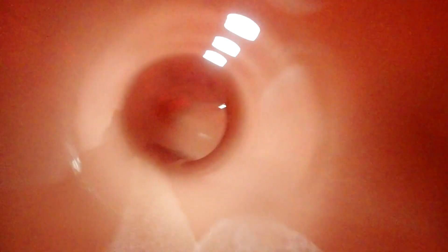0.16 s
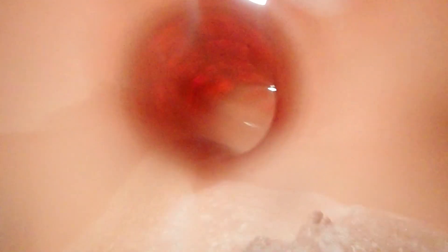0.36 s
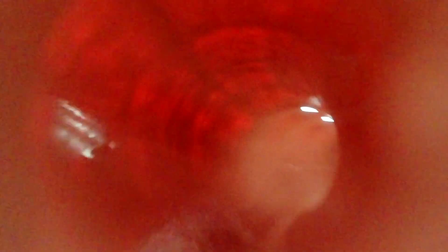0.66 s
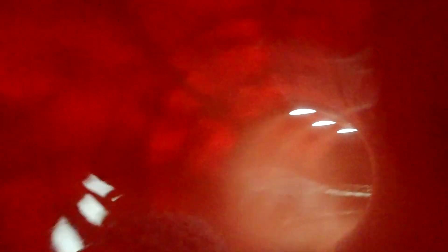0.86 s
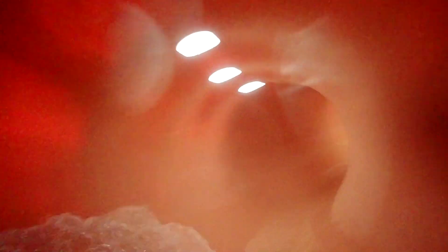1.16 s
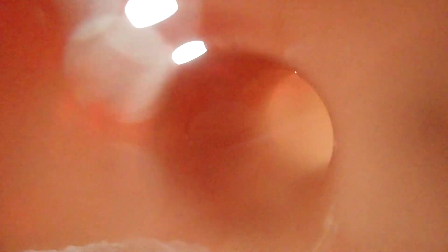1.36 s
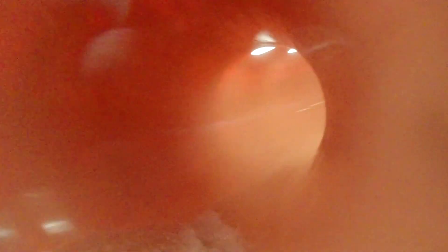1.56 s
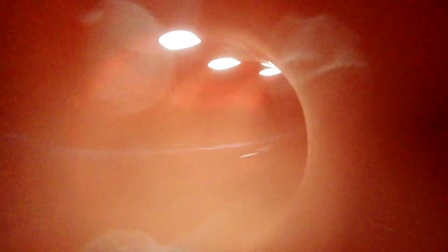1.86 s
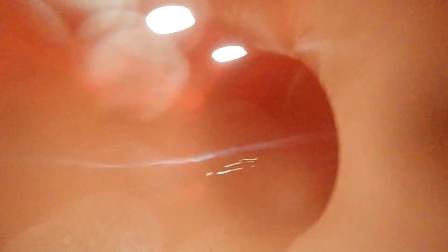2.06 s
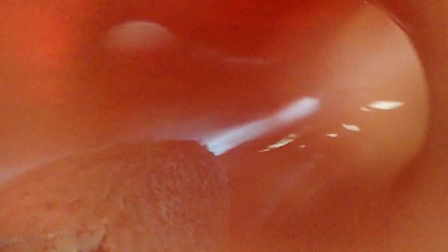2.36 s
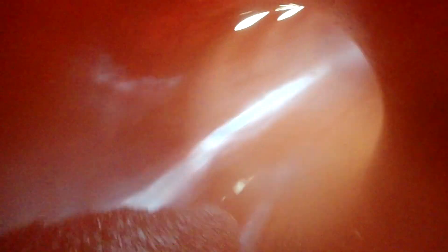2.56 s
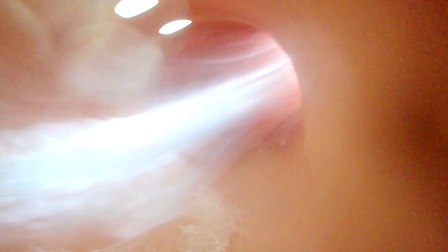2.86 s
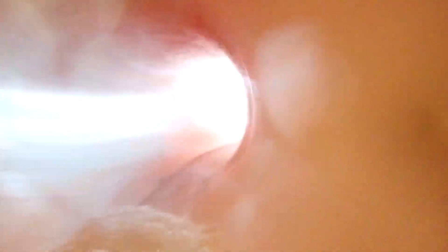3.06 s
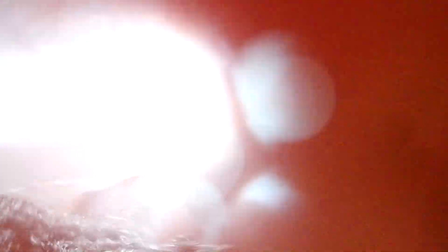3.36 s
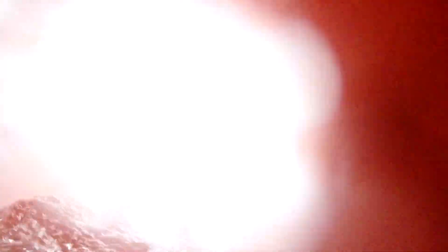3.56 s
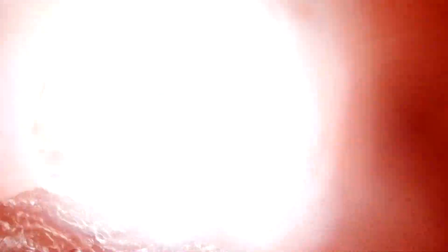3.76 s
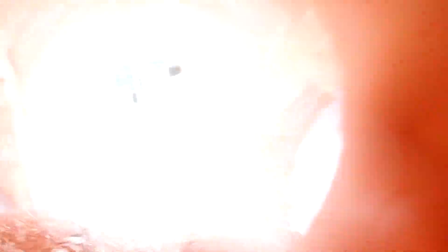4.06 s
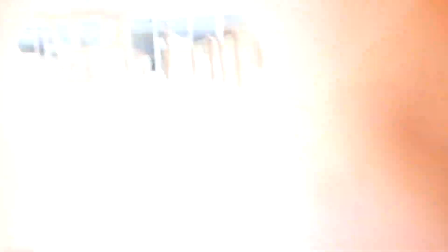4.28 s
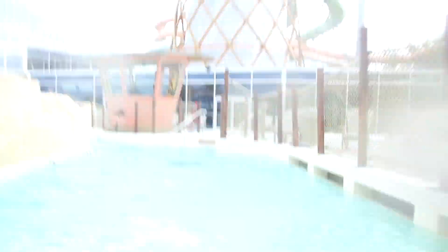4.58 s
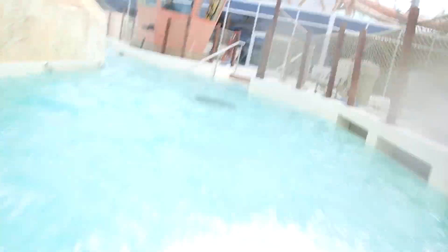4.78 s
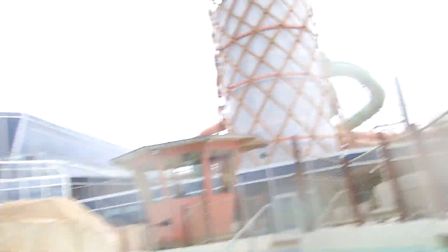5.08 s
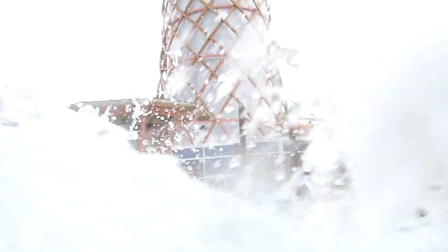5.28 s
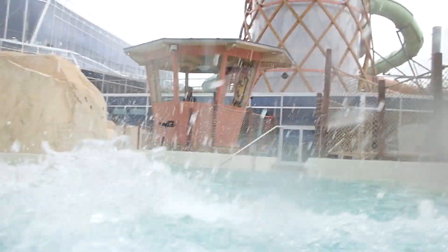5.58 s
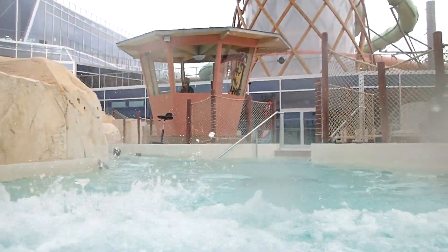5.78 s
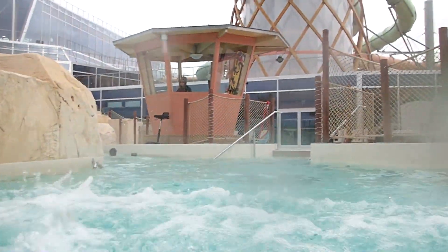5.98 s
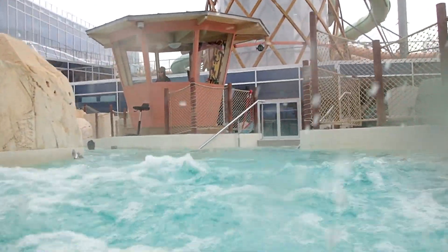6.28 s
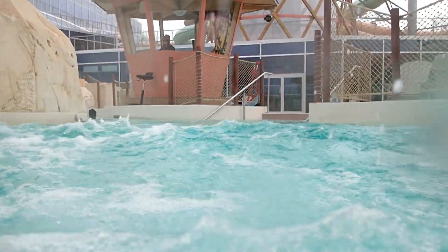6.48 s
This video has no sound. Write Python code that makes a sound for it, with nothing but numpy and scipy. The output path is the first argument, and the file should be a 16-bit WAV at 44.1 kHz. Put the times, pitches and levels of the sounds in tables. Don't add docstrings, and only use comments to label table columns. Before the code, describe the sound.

Water roars and wind buffets through an enclosed tube slide, then a hard splashing plunge, gulps, and muffled bubbling in a pool.

```python
import sys
import numpy as np
from scipy import signal
from scipy.fft import rfft, irfft, next_fast_len
from scipy.io import wavfile
from scipy.ndimage import uniform_filter1d, minimum_filter1d, map_coordinates

SR = 44100
rng = np.random.default_rng(int(sys.argv[2]) if len(sys.argv) > 2 else 0)


def wav_out(sig):
    wavfile.write(sys.argv[1], SR, np.round(np.clip(np.atleast_2d(sig).T, -1, 1) * 32767).astype(np.int16))


def gain_from_decibels(decibels):
    exponent = np.asarray(decibels, float) / 20
    return 10 ** exponent


N = 292383
TIME = np.arange(N) / SR
BLOW_TIME = np.arange(SR // 8) / SR


def unit(x):
    return x / np.sqrt(np.mean(np.abs(x) ** 2) + 1e-20)


def along(points, hz):
    f, v = np.transpose(points)
    return np.interp(np.log(hz + 1), np.log(f + 1), v)


def curves(rows, fade=0.017):
    s, *cols = np.transpose(rows)
    inside = np.minimum(TIME - s[0], s[-1] - TIME)
    gate = np.clip(inside / fade + 1, 0, 1)
    return [np.interp(TIME, s, c) for c in cols] + [gate]


def bumps(rows):
    return sum(db * np.exp(-((TIME - s) / half) ** 2) for s, db, half in rows)


def wobble(rate):
    at = [np.arange(N) * rate / SR]
    return np.array([map_coordinates(rng.standard_normal(N // 40), at) for port in "LR"])


def panned(db, pan_db):
    share = 1 / (1 + gain_from_decibels(-2 * np.asarray(pan_db)))
    return 2 * gain_from_decibels(db) * np.sqrt([share, 1 - share])


def rush(spectrum, alike, patchy_db, lumps_db=0):
    z = signal.stft(rng.standard_normal((2, N + 512)), nperseg=512)[2]
    field = uniform_filter1d(rng.standard_normal(z.shape[1:]), 6, 0)
    field = uniform_filter1d(field, 8, 1)
    pair = signal.istft(z * gain_from_decibels(patchy_db * unit(field)), nperseg=512)[1][:, :N]
    m = next_fast_len(N + 8192)
    hz = np.fft.rfftfreq(m, 1 / SR)
    alike = np.clip(along(alike, hz), 0, 1)
    a, b = rfft(pair * gain_from_decibels(lumps_db), m) * gain_from_decibels(along(spectrum, hz))
    right = alike * a + np.sqrt(1 - alike ** 2) * b
    return unit(irfft([a, right], m)[:, :N])


def add(out, s, sound):
    i = round(s * SR)
    out[:, i:i + sound.shape[1]] += sound


def ringing(events):
    out, t = np.zeros((2, N + SR)), BLOW_TIME
    for s, db, hz, pan_db, t60 in events:
        phase = 2 * np.pi * hz * t * (1 + 0.39 * t) + np.array([[0], [np.pi / 2]])
        onset = 1 - np.exp(-(t / 0.00071) ** 2)
        ring = np.sin(phase) * gain_from_decibels(-60 * t / t60) * onset
        add(out, s, panned(db, 1.4 * pan_db)[:, None] * ring)
    return out[:, :N]


# [t/s, level/dB]
SPRAY_RIDE = [(0.0, -35), (0.28, -38.5), (0.54, -28.5), (0.82, -27), (1.05, -33.5), (1.2, -28), (1.28, -34),
              (1.43, -29), (1.62, -29), (1.8, -22.5), (2.48, -23.5), (2.8, -19.5), (3.16, -21),
              (3.36, -25.5), (3.89, -24), (4.35, -32), (4.66, -35), (4.85, -25.5)]
# [t/s, level/dB]
SPRAY_PLUNGE = [
    (4.87, -22),
    (4.95, -18),
    (5.09, -19.5),
    (5.2, -19),
    (5.27, -22.5),
    (5.285, -24),
    (5.345, -36.5),
    (5.37, -59),
    (5.465, -53),
]
# [f/Hz, level/dB]
ROAR_SPECTRUM = [(25, -34), (143, -11.5), (400, -7.5), (520, -14), (1000, -1.5), (1500, -4.5),
                 (2050, -10.5), (2300, -19.5), (2600, -22.5), (3100, -29), (4000, -70.5)]
# [f/Hz, level/dB]
HISS_SPECTRUM = [(1710, -52), (2900, -31), (3460, -22.5), (4090, -15), (4670, -4), (5530, -1.5), (7640, -7),
                 (8790, -6), (9500, -10.5), (10600, -24), (13700, -15.5), (14700, -26.5), (15500, -26.5)]
# [f/Hz, coherence/1]
WATER_LIKENESS = [(200, 1), (800, 1), (2000, 0.88), (4000, 0.63), (7000, 0.48), (10000, 0.043)]
# [t/s, length/s, level/dB, left-right level/dB]
WATER_SLAPS = [(5.094, 0.014, -18, 0), (5.116, 0.022, -15, -1), (5.203, 0.032, -16, -5),
               (5.235, 0.017, -22, 3), (5.236, 0.016, -21, 1), (5.257, 0.013, -16.5, 10.5),
               (5.374, .012, -41.5, 5), (5.424, .012, -43, -0.5), (6.02, .018, -40, 1),
               (6.124, 0.017, -38, 4), (6.207, .008, -52, 0.5)]


def water():
    spray_db, gate = curves(SPRAY_RIDE + SPRAY_PLUNGE, fade=.003)
    surge_db = 0.25 * wobble(4.5)[0] + 0.091 * wobble(40)[0]
    roar = rush(ROAR_SPECTRUM, WATER_LIKENESS, patchy_db=1.23, lumps_db=1.1 * wobble(200)[0])
    hiss = rush(HISS_SPECTRUM, WATER_LIKENESS, patchy_db=0.8, lumps_db=0.51 * wobble(600))
    level = gate * gain_from_decibels(spray_db + surge_db)
    slaps = 0
    for s, length, db, pan_db in WATER_SLAPS:
        u = (TIME - s) / length
        swell = np.clip(3 * u, 0, 1) * np.clip((1 - u) * 12, 0, 1)
        slaps = slaps + gain_from_decibels(db + np.array([[.5], [-.5]]) * pan_db) * swell
    sizzle = unit(np.diff(rng.standard_normal((2, N + 1))))
    sheet = hiss + gain_from_decibels(-9.0) * roar + gain_from_decibels(-26.5) * sizzle
    return level * (roar + hiss) + slaps * gain_from_decibels(0.83 * wobble(650)) * sheet


# [t/s, strength level/dB, heading as left-right level/dB, flutter over rumble level/dB]
TUBE_WIND = [(0.0, -19.5, -30, -2.5), (0.35, -21, -24, 5.5), (0.42, -18.5, -22, -7.5), (0.65, -18, -16, -1),
             (1.01, -21, -10, 3), (1.21, -17.5, 3.5, -3.5), (1.38, -17.5, -13.5, 0), (1.57, -18, -4, -3),
             (1.77, -16.5, 1.5, -4.5), (2.46, -21, 8.5, -4.5), (2.66, -25, 6, -4), (3.2, -17.5, 0.5, -4),
             (3.46, -21, 3, -0.2), (3.88, -18, 4.5, -2.5), (4.12, -16, -20, -1), (4.23, -22, -8.5, 8.5),
             (4.61, -25, -14, 7.5), (4.85, -28.5, 0.5, 2)]
# [t/s, strength level/dB, heading left-right level/dB, flutter over rumble level/dB]
SKID_WIND = [
    (4.86, -31.5, -5, -25),
    (4.996, -20.5, -4, -2),
    (5.206, -49.5, -11, 8.5),
    (5.279, -28, 26, 12),
    (5.3, -6, 24, -13),
]
# [t/s, depth level/dB, half length/s]
FLOW_LULLS = [
    (.475, -4, 0.025),
    (1.15, 7, 0.062),
    (1.308, 7.5, 0.021),
    (1.42, 5, 0.041),
    (1.7, 6.5, 0.079),
    (1.87, 1, .1),
    (1.095, 8.5, 0.011),
    (4.76, 7, 0.015),
]
# [t/s, level over the usual thrum/dB, half length/s]
BEND_GUSTS = [
    (0.001, 9, 0.053),
    (1.215, 8.5, 0.041),
    (1.98, 0.5, 0.18),
    (2.4, 4, 0.25),
    (2.78, 6.5, 0.11),
    (4.03, 3, 0.039),
    (1, 0.5, .08),
]
# [f/Hz, level per Hz/dB]
RUMBLE_SPECTRUM = [(60, -37), (160, -13), (300, 0), (430, 3), (560, 0), (690, -10), (1000, -8), (2000, -82)]
# [f/Hz, level per Hz/dB]
THRUM_SPECTRUM = [(15, -51), (30, -25), (80, -10.5), (170, -1), (260, 0), (400, -5), (700, -46.5)]
# [f/Hz, level per Hz/dB]
FLUTTER_SPECTRUM = [(150, -27), (400, -12), (580, -4), (690, -8), (850, -0.5), (1300, -7.5), (1900, -22.5),
                    (2500, -36.5), (3300, -48.5), (5000, -68)]
# [f/Hz, level per Hz/dB]
SHEAR_SPECTRUM = [(700, -38), (1200, 7), (1700, 3), (2200, -7.5), (2700, -30), (4000, -23.5), (6000, -44)]


def wind():
    strength_db, heading, over_db, gate = curves(TUBE_WIND + SKID_WIND)
    spray_db, _ = curves(SPRAY_RIDE)
    in_tube = TIME < SPRAY_RIDE[-1][0]
    lull_db = bumps(FLOW_LULLS)
    rumble_db = strength_db - lull_db
    flutter_db = rumble_db + over_db - 0.15 * lull_db
    rumble_pan = np.where(in_tube, -6 + 0.14 * heading, heading)
    tube_thrum_db = -28.5 + 0.21 * (spray_db - spray_db.mean()) + bumps(BEND_GUSTS)
    thrum_db = np.where(in_tube, tube_thrum_db, rumble_db - 3)
    eddies = 1.06 * wobble(14) + 2.0 * wobble(70)
    rumble = rush(RUMBLE_SPECTRUM, [(100, 0.019)], patchy_db=0.0, lumps_db=eddies)
    thrum = rush(THRUM_SPECTRUM, [(100, 0.05)], patchy_db=0.5, lumps_db=eddies)
    slow = panned(rumble_db, rumble_pan) * rumble + panned(thrum_db, 0.75 * rumble_pan) * thrum
    small = 0.59 * eddies + 2.37 * wobble(200)
    shear_db = -12.5 + 1.16 * np.clip(flutter_db - rumble_db, -15, 12)
    flutter = rush(FLUTTER_SPECTRUM, [(100, 0.22)], patchy_db=-2.0, lumps_db=small)
    shear = rush(SHEAR_SPECTRUM, [(100, 0.05)], patchy_db=0.5, lumps_db=small)
    fast = flutter + gain_from_decibels(shear_db) * shear
    return gate * (slow + panned(flutter_db - 1.5, heading) * fast)


# [t/s, peak level/dB, f/Hz, left-right level/dB]
WIND_BUFFETS = [(0.186, -10, 605, -15.0), (0.424, -20, 455, -10.5), (0.485, -14, 312, -11.0),
                (0.526, -15, 393, -10.5), (0.586, -4, 615, -13.5), (1.456, -5, 780, -7.5),
                (1.649, -7, 369, -3), (1.998, -11, 393, -2), (3.373, 1, 528, -3), (3.442, -6, 530, 1),
                (3.669, -12, 482, -6), (4.09, -1, 530, -12), (4.362, -15, 1400, -8), (4.544, -12, 509, -7),
                (4.634, -6, 1220, -7.5), (4.673, -6, 930, -4), (4.702, -1, 1070, -11.0)]
# [t/s, peak level/dB, f/Hz, left-right level/dB, t60/s]
PORT_FLAPS = [
    (1.25, 0.5, 503, -11, 0.011),
    (1.326, -9, 501, -14, 0.033),
    (3.409, -3, 860, 4.0, 0.03),
    (4.735, -8.5, 604, -9, 0.033),
    (5.631, -9.5, 505, -8, 0.032),
]


def buffets_and_flaps():
    buffets = [(s, db - 4, hz, pan_db, 0.032) for s, db, hz, pan_db in WIND_BUFFETS]
    return ringing(PORT_FLAPS + buffets)


# [t/s, peak level/dB, f/Hz, left-right level/dB]
PORT_THUDS = [(1.201, -10, 273, -2), (1.538, -10, 323, 1), (2.695, -7, 316, -1.5), (2.799, -7, 266, 2),
              (3.269, -4, 280, 1), (3.368, -19, 301, -13), (3.408, 1, 330, 2), (4.019, -9, 283, 10),
              (5.279, -4, 285, 20), (5.682, -24.5, 224, 16), (5.707, -17.5, 318, 5),
              (6.058, -5.5, 150, -25), (6.053, -13, 85, -20.5), (1.213, -8, 212, -0.5)]


def thuds():
    out, t = np.zeros((2, N + SR)), BLOW_TIME
    for s, db, hz, pan_db in PORT_THUDS:
        sign = np.array([[1], [rng.choice([-1, 1])]])
        push = np.sin(2 * np.pi * hz * t) * (1.4 * hz * t) * np.exp(1 - 2.2 * hz * t)
        add(out, s, panned(db + 1.5, 2.2 * pan_db)[:, None] * sign * push)
    return out[:, :N]


# [t/s, peak level/dB, left-right level/dB]
EDDY_SNAPS = [(0.0404, -32, -9), (0.2418, -31, -15), (0.4574, -33, -9), (0.992, -33, -6.0),
              (1.2121, -34, 0.5), (1.2521, -31, -9), (1.3274, -31, -8), (1.4571, -28.5, -8),
              (1.8128, -32, 0.0), (1.8472, -33, 0.0), (2.1321, -32.5, -0.5), (2.3296, -38, -2),
              (2.6359, -31.5, -2), (3.4012, -31, 5), (3.597, -33, 0.0), (3.8162, -35.5, -1),
              (4.198, -32, -12), (4.2896, -34, -12.5), (4.3226, -28, -10.5), (4.3565, -35, -10.0),
              (4.4613, -29, -19.0), (4.5007, -33, -17.0), (4.5885, -28, -13), (4.6104, -29, -10.5)]


def snaps():
    out = np.zeros((2, N + SR))
    u = BLOW_TIME / 0.00013
    snap = u * np.exp(1 - u) * (1 - u / 3)
    for s, db, pan_db in EDDY_SNAPS:
        add(out, s, panned(db + 17, 1.4 * pan_db)[:, None] * snap)
    return out[:, :N]


# [t/s, peak level/dB, body level against the peak/dB, left-right level/dB]
WATER_DROPS = [(4.4965, -12.5, 8.5, -27), (4.924, -8, -31, -8), (5.306, -20, -11, 2),
               (5.315, -22, -25, -0.5), (5.325, -15, -21, -15.5), (5.3305, -20.5, 6, 12.5),
               (5.3483, -17.5, 4.5, -21), (5.358, -23.5, 15, -21), (5.4, -21, 7.5, 17),
               (5.424, -26, -11, -1), (5.461, -25, 4, 25), (5.488, -27, -20, -5), (5.511, -42, -27, 6),
               (5.5233, -34, -19, 5), (5.519, -38, -22, 0), (5.631, -47, 18, -16), (5.95, -25, -7, 12),
               (6.0062, -36, -12, 8), (6.025, -20, -3, -1), (6.134, -17.5, -16, 1), (6.6244, -45, 7, -4)]
# [t/s, peak level/dB, body level
# against the peak/dB, left-right level/dB, length/s]
WATER_RAPS = [(0.001, -32, 8, -12, .003), (1.668, -30, 10, -12, .0049), (5.103, -12, -14, 1.5, .0014),
              (5.1212, -1, -21, 2, .0012), (5.131, 8, -14.5, 0, .0011), (5.2145, -6, -12, 6, .002),
              (5.2217, 1.5, -18.5, -11, .0013), (5.254, -4, -4, -4, .0018), (5.2618, -15, 10, 15, .0033),
              (5.291, -26, 10, 15, .003), (5.3012, -26, 9, 17, .002), (5.3482, -12, -8, -19, .0013),
              (5.374, -42, 10, -23, .0045), (5.377, -31, 10, 22, .007), (5.392, -32, -15, 4, .008),
              (5.412, -40, 6, -21, .003), (5.427, -33, 9, -21, .0069), (5.432, -31, -15, 0, .01),
              (5.446, -32, -18, 0, .003), (5.464, -42, 9, -20, .0026), (5.5431, -9, -6, 5, .0016),
              (6.043, -44, 12, -10, .004), (6.056, -36, 10, -23, .0027), (6.061, -17, 10, -24, .0027),
              (6.0662, -18, 9, -27, .001)]
# [f/Hz, level per Hz/dB]
CRACK_SPECTRUM = [(2500, -35), (4300, -17), (5800, 3), (8500, -6), (10500, -18), (15500, -38), (18000, -27)]
# [f/Hz, level per Hz/dB]
KNOCK_SPECTRUM = [(150, -7), (500, 3.5), (1300, 15.5), (2200, -1.5), (3200, -12.5), (4200, -18.5),
                  (6000, -19.5)]


def impacts():
    out = np.zeros((2, N))
    crack = rush(CRACK_SPECTRUM, [(5000, 0.38)], patchy_db=0.5)
    knock = rush(KNOCK_SPECTRUM, [(1000, 0.51)], patchy_db=-2.5)
    drops = [(*drop, 0.0031) for drop in WATER_DROPS]
    for s, db, body_db, pan_db, length in drops + WATER_RAPS:
        i = round(s * SR)
        u = 2.1 * BLOW_TIME[:N - i] / max(length, 1e-3)
        span = slice(i, i + len(u))
        both = crack[:, span] + gain_from_decibels(body_db + 8.0) * knock[:, span]
        out[:, span] += panned(db - 7.5, pan_db)[:, None] * u * np.exp((1 - u ** 2) / 2) * both
    return out


# [t/s, peak level/dB, f/Hz, t60/s]
GULPS_LEFT = [(5.258, -8, 1410, 0.053), (5.268, -7.5, 797, 0.093), (5.278, -7, 739, 0.11),
              (5.288, -2, 578, 0.06), (5.3, -4, 527, 0.036), (5.31, -23, 490, .082),
              (5.3311, -3.5, 630, 0.027), (5.376, -3, 485, 0.077), (5.398, -1.5, 515, 0.054),
              (5.447, -15, 490, .065), (5.511, -6, 490, 0.023), (5.5437, -1.5, 940, 0.011),
              (5.544, -8, 218, 0.027)]
# [t/s, peak level/dB, f/Hz, t60/s]
GULPS_RIGHT = [
    (5.348, -11.5, 412, 0.068),
    (5.359, 5.5, 450, .046),
    (5.374, -12, 380, .03),
    (5.396, -6, 423, 0.021),
    (5.427, 1, 423, 0.019),
    (6.058, -1.5, 169, 0.055),
    (6.067, 3, 474, 0.07),
]


def gulps():
    one_port_db = 31
    left = [(s, db, hz, one_port_db, t60) for s, db, hz, t60 in GULPS_LEFT]
    right = [(s, db, hz, -one_port_db, t60) for s, db, hz, t60 in GULPS_RIGHT]
    overtones = [(s, db - 14, 2.64 * hz, pan_db, 0.016) for s, db, hz, pan_db, t60 in right]
    return ringing(left + right + overtones)


def hum(hz, width_hz, lumps_db):
    pole = np.exp(-np.pi * width_hz / SR)
    push = gain_from_decibels(lumps_db) * (rng.standard_normal(N) + 1j * rng.standard_normal(N))
    envelope = signal.lfilter([1], [1, -pole], push)
    return unit(np.real(envelope * np.exp(2j * np.pi * np.cumsum(hz) / SR)))


# [t/s, level/dB]
PORT_SLOSH = [
    (5.35, -18),
    (5.478, -28),
    (5.596, -24),
    (5.678, -31.5),
    (5.812, -22),
    (6.054, -17.5),
    (6.15, -24),
    (6.558, -19.5),
    (6.63, -26.5),
]


def flooded():
    right_db, gate = curves(PORT_SLOSH, fade=0.0067)
    clear_s, drained_hz, full_hz = 5.48, 820, 690.5
    left_db = right_db - np.interp(TIME, [clear_s, 5.68], [25, 0])
    left_hz = drained_hz - (drained_hz - full_hz) * np.exp(-np.maximum(TIME - clear_s, 0) / .3)
    wave_s, soak_s = 6.09, 0.045
    right_hz = np.interp(TIME, [wave_s - soak_s, wave_s + soak_s], [490, 440])
    slosh = 1.5 * wobble(90)
    left = hum(left_hz, width_hz=140, lumps_db=slosh[0])
    left = left + gain_from_decibels(-11.5) * hum(0.67 * left_hz, width_hz=130, lumps_db=slosh[0])
    right = hum(right_hz, width_hz=87, lumps_db=slosh[1])
    m = next_fast_len(N)
    hz = np.fft.rfftfreq(m, 1 / SR)
    steep = 1 / (1 + (hz / [[1150], [680]]) ** 6)
    steep = steep * hz ** 2 / (hz ** 2 + 260 ** 2)
    plugs = [gain_from_decibels(left_db + 5.5) * left, gain_from_decibels(right_db + 7.5) * right]
    return gate * irfft(rfft(plugs, m) * steep, m)[:, :N]


# [centre t/s, peak level/dB, f/Hz, half length/s]
BUBBLES_LEFT = [(5.345, -7, 332, 0.0055), (5.361, -11, 454, 0.0073), (5.421, -8, 474, 0.0092),
                (5.443, -7, 330, 0.008), (5.461, -7.5, 460, 0.011), (5.482, -7, 495, .012),
                (5.525, -13, 554, 0.007), (5.558, -7, 563, 0.0096), (5.594, -11, 570, 0.0067),
                (5.72, -19, 670, .015), (5.74, -18, 796, .005), (5.805, -14, 730, 0.0089),
                (5.99, -12, 795, 0.018), (6.025, -9, 575, 0.013), (6.045, -9, 850, 0.0073),
                (6.044, -13, 495, .008), (6.119, -10, 805, .004), (6.2, -18, 900, .01),
                (6.322, -14, 820, 0.0093), (6.358, -16, 780, .008), (6.418, -6.5, 765, 0.012),
                (6.449, -13, 810, .006), (6.473, -11, 820, 0.0097), (6.515, -8, 824, 0.0089),
                (6.535, -11, 850, .008), (6.556, -9, 807, 0.0087), (6.583, -11.5, 824, 0.0075),
                (6.6, -15, 810, .005)]
# [centre t/s, peak level/dB, f/Hz, half length/s]
BUBBLES_RIGHT = [(5.392, 3.5, 367, 0.0015), (5.408, -7, 400, 0.0047), (5.416, 4.5, 390, 0.0022),
                 (5.442, -8, 376, 0.0035), (5.451, -7, 390, 0.0046), (5.47, -2.5, 388, 0.0068),
                 (5.485, -7.5, 330, 0.015), (5.513, -9.5, 348, 0.004), (5.568, -12, 450, .005),
                 (5.595, -16, 473, 0.0092), (5.66, -23, 457, 0.018), (5.71, -15, 498, 0.012),
                 (5.74, -21, 496, 0.0069), (5.826, -6.5, 510, 0.007), (5.845, -7.5, 518, 0.011),
                 (5.978, -16, 563, 0.0057), (6.004, -10, 520, .005), (5.878, -12, 483, 0.012),
                 (5.926, -11, 442, 0.011), (6.026, -1.5, 504, 0.0096), (6.046, -1, 490, 0.0071),
                 (6.14, -6, 453, 0.01), (6.19, -17, 395, .008), (6.25, -13, 450, 0.013),
                 (6.28, -13, 440, 0.016), (6.307, -11.5, 455, 0.0089), (6.351, -10, 450, 0.0056),
                 (6.396, -12, 470, 0.012), (6.432, -9, 446, .007), (6.472, -10.5, 440, 0.0085),
                 (6.504, -14, 445, 0.0052), (6.518, -9, 447, 0.0036), (6.534, -8, 440, 0.0064),
                 (6.576, -13, 430, .007), (6.605, -12, 400, 0.0053)]


def bubbles():
    out, t = np.zeros((2, N + SR)), np.arange(-SR // 20, SR // 20) / SR
    rise_per_s = 4.9
    for side, port in enumerate((BUBBLES_LEFT, BUBBLES_RIGHT)):
        for s, db, hz, half in port:
            phase = 2 * np.pi * hz * t * (1 + rise_per_s * t / 2)
            ring = np.sin(phase) * np.exp(-(t / half) ** 2)
            out[side, round(s * SR) - SR // 20:][:len(t)] += gain_from_decibels(db) * ring
    return out[:, :N]


# [t/s, level/dB]
POOL_FOAM = [
    (5.3, -60),
    (5.352, -31),
    (5.462, -37),
    (5.514, -91),
    (5.654, -60),
    (5.762, -48.5),
    (5.95, -42),
    (6.49, -51),
    (6.63, -46.5),
]
# [f/Hz, level per Hz/dB]
CHURN_SPECTRUM = [(20, -27), (60, -13.5), (120, -2), (250, 6.5), (600, 2), (1100, 2), (1700, -9.5),
                  (2200, -25), (2450, -43), (2850, -34), (3400, -49), (4500, -57), (6000, -88)]
# [f/Hz, level per Hz/dB]
FIZZ_SPECTRUM = [(2000, -64), (3800, -35.5), (4700, -26), (5200, -8), (5700, 1), (7000, -11.5),
                 (8800, -8.5), (10500, -26.5), (13000, -29), (15600, -31)]


def pool():
    foam_db, gate = curves(POOL_FOAM)
    under = TIME < 5.49
    fizz_db = -49.5 + 0.77 * np.maximum(foam_db + 44.0, -19) - 11 * under
    murmur = gain_from_decibels(-41.5)
    churn_gain = (gain_from_decibels(foam_db + 18.5 - 4.7 * under) + murmur) * gain_from_decibels([[1.5], [-2.5]])
    churn_alike = [(100, 1.0), (2000, 0.91), (3000, 0.36)]
    churn = rush(CHURN_SPECTRUM, churn_alike, patchy_db=2.5, lumps_db=1.5 * wobble(50))
    fizz = rush(FIZZ_SPECTRUM, [(5000, 0.13), (9000, .1)], patchy_db=1.0, lumps_db=1.7 * wobble(140))
    return gate * (churn_gain * churn + gain_from_decibels(fizz_db + 4.5) * fizz)


def scene():
    flow = water() + wind() + buffets_and_flaps() + thuds() + snaps()
    return flow + impacts() + gulps() + flooded() + bubbles() + pool()


# [t/s, depth level/dB, recovery/s]
LIMITER_DIPS = [(.251, 2.5, 0.038), (0.461, 6.5, 0.085), (1.29, 2.5, 0.047), (1.459, 1.5, .05),
                (2.9, 4.5, 0.027), (3.38, 4, 0.11), (4.019, 3.5, 0.058), (4.387, 7, 0.057),
                (5.131, 8, 0.073), (5.467, 15, 0.032), (5.55, 13.5, 0.093), (6.072, 17, 0.069)]


def limiter(x):
    dip_db = 0
    for s, db, back in LIMITER_DIPS:
        attack = np.clip((TIME - s) / 0.0022, 0, 1)
        dip_db = dip_db + db * attack * np.exp(-np.maximum(TIME - s, 0) / back)
    x = x * gain_from_decibels(-dip_db)
    sensed = np.abs(uniform_filter1d(x, size=7)).max(0)
    wanted = np.minimum(1, 0.84 / (sensed + 1e-9))
    held = minimum_filter1d(wanted, size=601, origin=220)
    return x * uniform_filter1d(held, size=141)


def top_cut(x):
    return signal.sosfilt(signal.butter(12, 15640, fs=SR, output="sos"), x)


def record(dry):
    bass_cut = signal.butter(2, 45, "high", fs=SR, output="sos")
    mix = limiter(signal.sosfilt(bass_cut, dry))
    mix = np.clip(mix, -1.04, 1.04)
    return top_cut(mix)


dry = scene()
out = record(dry)
wav_out(out)
```